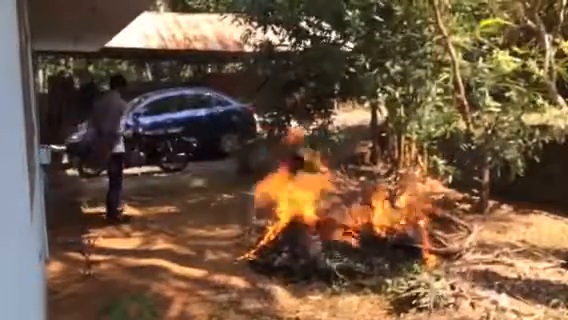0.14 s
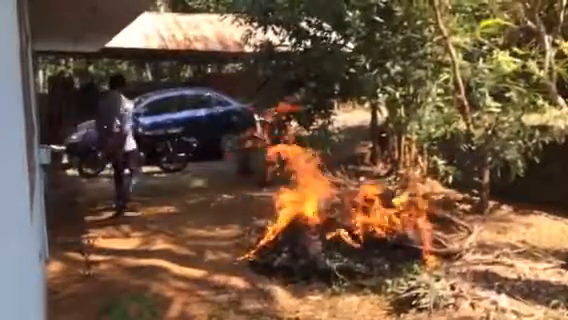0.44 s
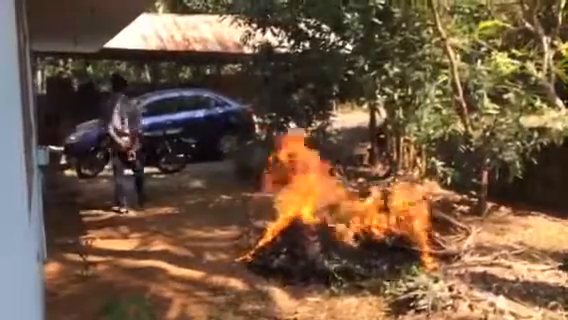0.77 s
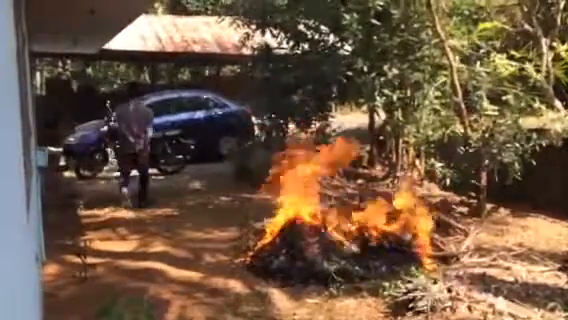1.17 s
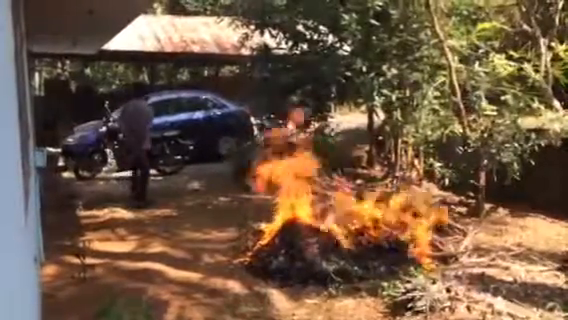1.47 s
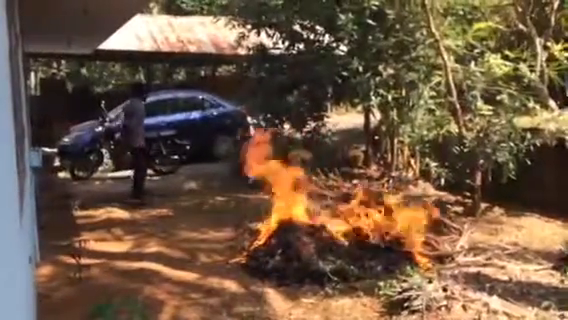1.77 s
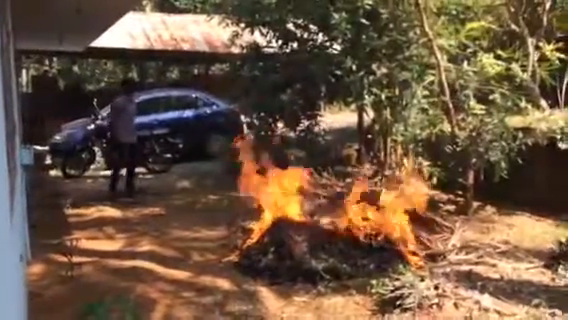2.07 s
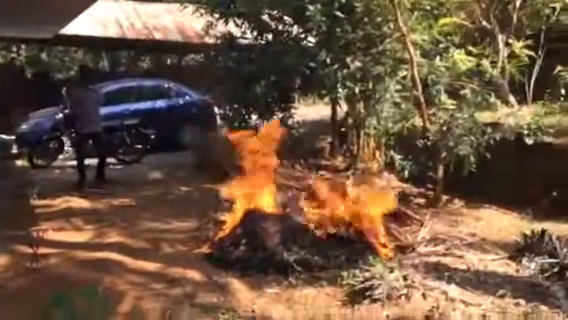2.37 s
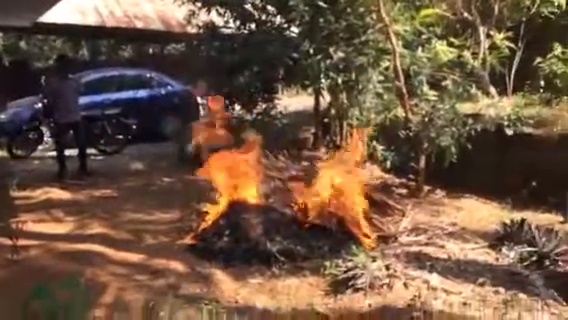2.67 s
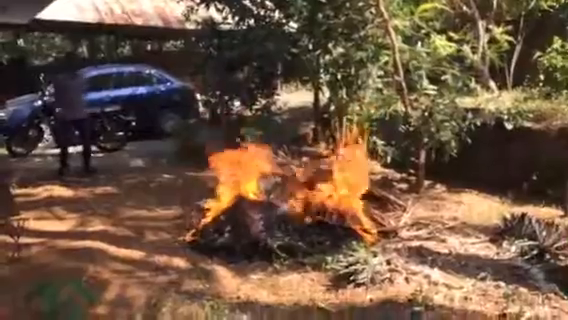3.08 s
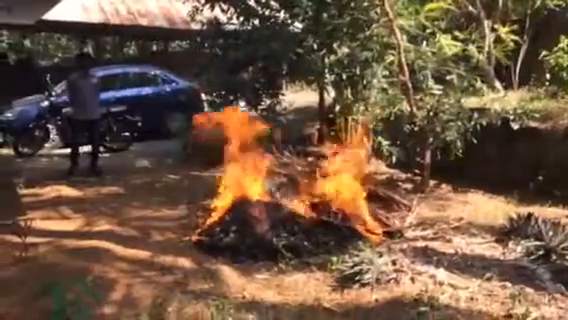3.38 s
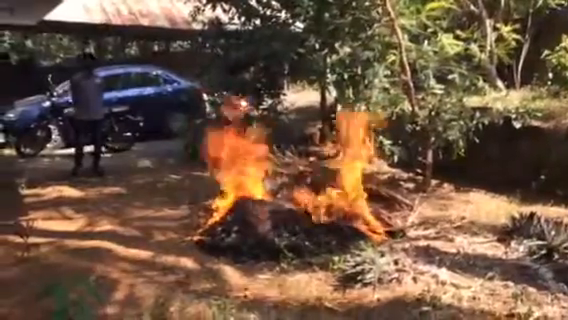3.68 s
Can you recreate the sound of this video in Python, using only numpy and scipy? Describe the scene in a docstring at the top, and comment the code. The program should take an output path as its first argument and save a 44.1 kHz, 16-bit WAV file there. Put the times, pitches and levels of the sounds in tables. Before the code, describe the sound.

Fire crackles in an outdoor yard, heard from a few metres away: fine dry leaf ticks throughout, then increasingly dense twig snaps with short scattered echoes, above low fluttering flames and faint airy hiss.

```python
"""A pile of leaves and branches burns in an open yard, a few metres from the microphone.
From the start dry leaves tick in random snaps over a noise sizzle, and filtered noise rumbles as flames.
Outdoor air, a midrange hiss and a thin wavering sine whine stand behind; the whine peaks near 1.1 s.
From 0.38 s twigs burst in sharp noise pops that scatter back from the yard, the highest level at 3.28 s.
The ticks grow strongest around 3 s, then fade towards the end."""
import sys
import numpy as np
from scipy import signal
from scipy.fft import rfft, irfft, next_fast_len
from scipy.io import wavfile
from scipy.ndimage import uniform_filter1d

SR = 44100
rng = np.random.default_rng(int(sys.argv[2]) if len(sys.argv) > 2 else 0)


def store_pcm(level_fs):
    """Save levels as 16-bit WAV."""
    pcm = np.round(np.clip(level_fs, -1, 1) * 32767).astype(np.int16)
    wavfile.write(sys.argv[1], SR, np.atleast_2d(pcm).T)


N = 169344

# How briskly the leaves burn: start_s, briskness [no unit; TICK_DB_PER_BRISKNESS turns it into dB]
BRISKNESS = [(0, -2), (.38, -1.5), (.58, -1), (1.0, -3), (1.33, -2.5), (1.7, -2), (2.2, 0), (2.5, 1.5),
             (2.65, 0.5), (3.0, 4), (3.2, -1.5), (3.45, 1.5), (3.65, -5.5), (3.84, -13)]
# Tone of the leaf ticks: freq_hz, gain_db
TICK_COLOUR = [(200, -63), (900, -1.5), (2200, -17.5), (3200, -1), (6000, -0.5), (9000, 0.5), (15000, 3)]
# Spectrum shape of the sizzle: freq_hz, relative_db [per Hz]
SIZZLE_SPECTRUM = [(300, -30), (1500, -39), (3000, -4), (4300, -0.5), (6800, 2.5), (10000, 0),
                   (15000, -0.5)]
# Level of the sizzle: start_s, level_db [rms]
SIZZLE_LEVEL = [(0, -66), (.4, -66.5), (.54, -61), (.66, -60), (.8, -62.5), (1.0, -62.5), (1.33, -62),
                (1.5, -63), (1.7, -61), (1.88, -62), (2.2, -64.5), (2.5, -62.5), (2.64, -63.5), (3.0, -65),
                (3.2, -58), (3.45, -63), (3.65, -60), (3.84, -60.5)]
# Spectrum shape of the flames' rumble: freq_hz, relative_db [per Hz]
RUMBLE_SPECTRUM = [(15, -27), (28, -15), (45, -9), (62, -8), (85, -4), (115, -1), (150, -4), (185, -5.5),
                   (225, -21.5), (300, -19.5), (600, -45.5), (2000, -71)]
# Surges of the flames, mostly low: centre_s, length_s, centre_hz, level_db [rms at the peak]
FLAME_SURGES = [(0.06, 0.15, 97, -47), (0.252, 0.29, 170, -57.5), (0.568, 0.086, 107, -49.5),
                (0.712, 0.059, 278, -57.5), (1.29, 0.055, 117, -49.5), (1.575, 0.047, 283, -50.5),
                (2.036, 0.054, 118, -50), (2.259, 0.071, 113, -46.5), (2.49, 0.16, 112, -53.5),
                (2.514, 0.073, 256, -57), (2.898, 0.25, 1690, -68), (2.998, 0.032, 102, -44.5),
                (3.412, 0.064, 253, -54), (3.605, 0.024, 1490, -61), (3.809, 0.075, 97, -45.5)]
# Spectrum shape of the low outdoor noise: freq_hz, relative_db [per Hz]
OUTDOOR_SPECTRUM = [(100, -3.5), (230, -3.5), (280, -0.5), (325, -4), (410, 3), (490, -6), (570, -4),
                    (780, -10), (1200, -24), (3000, -39)]
# Middle level of the outdoor noise, which drifts around it: start_s, level_db
OUTDOOR_LEVEL = [(0, -64), (.45, -59), (.7, -61.5), (1.0, -62.5), (1.7, -62), (2.2, -61), (2.55, -58.5),
                 (2.85, -59), (3.1, -61), (3.5, -60.5), (3.84, -60.5)]
# Spectrum shape of the midrange hiss: freq_hz, relative_db [per Hz]
MID_HISS_SPECTRUM = [(300, -28), (800, -6), (1120, 1.5), (1350, 4.5), (1550, -1.5), (2200, -4.5),
                     (2560, -1), (2950, -9.5), (6000, -17), (15000, -37)]
# Middle level of the midrange hiss, which drifts around it: start_s, level_db
MID_HISS_LEVEL = [(0, -60.5), (.38, -62), (.55, -63), (1.1, -62.5), (1.7, -64.5), (2.3, -63.5),
                  (2.7, -65.5), (3.0, -61), (3.5, -63.5), (3.6, -60), (3.84, -62.5)]
# Thin whine, middle values that it wavers around: start_s, pitch_hz, level_db
WHINE = [(0, 1261, -71), (.5, 1262, -69), (.7, 1255, -64.5), (.82, 1254, -69), (1.03, 1262, -62.5),
         (1.1, 1262, -57.5), (1.16, 1275, -66), (1.22, 1282, -64.5), (1.33, 1292, -60), (1.43, 1263, -75),
         (2.3, 1308, -74), (3.0, 1292, -72.5), (3.5, 1303, -75), (3.84, 1278, -65)]
# Bursting twigs: start_s, level_db [before POP_LIFT_DB], bass_db, treble_db,
# echo_db [sent to the yard, against the pop], ring_hz, splinter_db [against the snap, held to 0 at most]
TWIG_POPS = [(0.3794, -46.5, 10, -4, -11, 7250, -7), (0.3936, -52.5, 0, 0, -10, 7020, -11),
             (0.9201, -48.5, -2, 1, 0, 6460, -10), (1.0389, -50, 12, 10, -3, 12340, -7),
             (1.0603, -40.5, -6, -0.5, -1.5, 7100, -12), (1.1455, -43.5, 5, 4.5, -5, 7600, -1),
             (1.264, -44.5, -28, 0.5, -9, 6050, -8), (1.3688, -41.5, -36, -2.5, -4.5, 5800, -17),
             (1.4004, -48, -18, 3, -10, 8020, 0), (1.5568, -28.5, -3.5, -3.5, -2.5, 5540, -14.5),
             (1.6069, -44, -3, -1, -10, 5230, -9), (1.8994, -37, -2, 0, -1, 6200, -11),
             (2.007, -41.5, 1, -5, -20, 5140, -8), (2.265, -27.5, -27, 6, -1, 10090, 13),
             (2.3699, -44.5, -16, 4, -7, 7850, -19), (2.3932, -42, -1, 0.5, -3, 5400, -2),
             (2.4437, -34.5, -4, 6, -4.5, 13500, -10), (2.5081, -51.5, -11, 3, -7, 8680, -3),
             (2.6006, -46, 8, 5, -6, 13430, 0), (2.6562, -35.5, -5, 6, -5.5, 11800, -4),
             (2.7044, -33, -8, 4.5, 0.5, 10900, -12), (2.7102, -33.5, -5.5, -0.5, -2, 6910, 0),
             (2.7544, -38, 0, 4.5, -3.5, 10910, -6), (2.8669, -44.5, 2, 0, -20, 5160, 3),
             (2.9175, -42.5, 4, 5, -16, 7410, -7), (2.926, -46.5, -2, 0, -1, 5520, 0),
             (3.0031, -39, 2, 2, 0, 3060, 4), (3.1214, -42.5, 3, 6, 5, 12150, 1),
             (3.158, -42, -14, -2, -4, 11290, -5), (3.1871, -43.5, 2, 1, -13, 8980, 0),
             (3.2039, -45.5, 0, 1, -1, 13680, 1), (3.2166, -39, 5, 6, -8, 4750, -6),
             (3.238, -43.5, -1, 6, -1, 13470, -6), (3.2759, -19, 0, 0, -10.5, 3250, -12),
             (3.3455, -42.5, -22, 3, -8, 13350, -7), (3.3864, -47.5, -15, -4, -7, 6730, 1),
             (3.3914, -44, -10, 1, -11, 6900, 0), (3.3998, -46.5, 6, 1, -0.5, 9540, 4),
             (3.4421, -50.5, 2, 0, 2, 5540, 4), (3.6892, -26.5, -5, 4.5, -7, 8900, 1),
             (3.701, -32, -6.5, -3, -5.5, 4790, -6)]
# Tone of all the pops: freq_hz, gain_db
POP_COLOUR = [(100, -29), (480, -11.5), (950, 0.5), (1400, -4), (2300, 1.5), (3200, -0.5), (4100, -1),
              (5400, 3), (8000, 2), (13000, -1), (15000, -5)]

# The break, then the fibres tearing after it: decay times to 1/e
SNAP_S, SPLINTER_S = 0.00063, 0.0029
FLATTEN = .5  # how far each pass evens out a break's random spectrum, 0-1

TICKS_PER_S, TICK_DB, TICK_SPREAD_DB = 300, -46.5, 4.5
TICK_DB_PER_BRISKNESS = 1.7
# Each leaf favours its own broad band; the spread is in natural-log units of pitch
LEAF_HZ, LEAF_SPREAD, LEAF_WIDTH_HZ, LEAF_RING_DB = 7300, 0.59, 1400, 8.5
LEAF_SPLINTER_DB = -9.5
SIZZLE_GRAIN_DB = -0.5
RUMBLE_DB, FLUTTER_DB = -53.5, 0.6
SURGE_WIDTH = 0.15  # share of the centre frequency
OUTDOOR_DRIFT_DB, MID_HISS_DRIFT_DB = 2.16, 2.2
WHINE_WAVER_HZ, WHINE_FLICKER_DB, WHINE_OCTAVE_DB = 11.9, 2.5, -20
ECHO_DELAY_S, ECHO_T60_S, ECHO_DB, FAR_T60_S, FAR_DB = .005, 0.19, -0.5, 0.78, -27.5
ECHO_GRAIN_DB = 3  # unevenness of the scatter
TICK_ECHO_DB = -12
POP_LIFT_DB = 20.5
RING_WIDTH_HZ, RING_DB = 200, 9  # each twig has one short resonance
TOP_HZ = 15200


def undb(db):
    """Decibels to gain."""
    return 10 ** (np.asarray(db) / 20)


def unit(x):
    """Scale to an rms of 1."""
    return x / np.sqrt(np.mean(x ** 2))


def sized(x, db):
    """Set the energy of a short sound."""
    return x / np.sqrt(np.sum(x ** 2)) * undb(db)


def curve(table, axis=1):
    """One column of a time table, at every sample."""
    rows = np.array(table)
    return np.interp(np.arange(N) / SR, rows[:, 0], rows[:, axis])


def walk(rate):
    """Smooth random drift with an rms of 1, from `rate` random steps a second."""
    k = max(int(SR / rate), 2)
    steps = rng.standard_normal(N // 8)[np.arange(N) // k]
    return unit(uniform_filter1d(uniform_filter1d(steps, k), k))


def colour(x, points):
    """Causal minimum-phase filter through (Hz, dB) points."""
    size = 2 * next_fast_len(len(x))
    hz, db = np.array(points, float).T
    log_freq = np.log(np.fft.rfftfreq(size, 1 / SR) + 1)
    gain = undb(np.interp(log_freq, np.log(hz), db))
    # fold the cepstrum forward in time, so that nothing sounds early
    cepstrum = irfft(np.log(gain))
    cepstrum[1:size // 2] *= 2
    cepstrum[size // 2 + 1:] = 0
    response = np.exp(rfft(cepstrum))
    return irfft(rfft(x, size) * response)[:len(x)]


def noise(spectrum):
    """Steady noise of a given spectrum shape, at an rms of 1."""
    return unit(colour(rng.standard_normal(N), spectrum))


def add(out, at_s, x):
    """Mix a short sound in at a given time."""
    i = max(int(at_s * SR), 0)
    out[i:i + len(x)] += x[:max(N - i, 0)]


def ring(x, hz, width_hz, db):
    """Lift one resonance out of a sound."""
    hz = min(hz, .4 * SR)
    b, a = signal.iirpeak(hz, hz / width_hz, fs=SR)
    return x + (undb(db) - 1) * signal.lfilter(b, a, x)


def crack(splinter_db, size=640):
    """One broadband break of unit energy: a sudden snap and a few milliseconds of splintering."""
    t = np.arange(size) / SR
    snap, fibres = rng.standard_normal((2, size))
    x = np.tanh(2 * snap) * np.exp(-t / SNAP_S)
    x = x + undb(min(splinter_db, 0)) * fibres * np.exp(-t / SPLINTER_S)
    for _ in range(2):  # even out the spectrum, so that the break has little pitch
        spectrum = rfft(x, 2 * size)
        x = irfft(spectrum / (np.abs(spectrum) + 1e-12) ** FLATTEN)[:size]
    return sized(x, 0)


def leaf_ticks(briskness, count=2000):
    """Small random breaks, some dull and some bright, mostly faint, stronger as the leaves burn briskly."""
    out = np.zeros(N)
    gaps, strengths = rng.exponential(size=(count, 2)).T
    starts_s = np.cumsum(gaps) / TICKS_PER_S
    levels_db = TICK_DB + TICK_SPREAD_DB * np.minimum(strengths, 3.2)
    pitches_hz = LEAF_HZ * np.exp(LEAF_SPREAD * rng.standard_normal(count))
    for start_s, level_db, pitch_hz in zip(starts_s, levels_db, pitches_hz):
        if start_s < N / SR:
            tick = ring(crack(LEAF_SPLINTER_DB), pitch_hz, LEAF_WIDTH_HZ, LEAF_RING_DB)
            add(out, start_s, sized(tick, level_db))
    return colour(out, TICK_COLOUR) * undb(TICK_DB_PER_BRISKNESS * briskness)


def sizzle():
    """Countless tiny bursts merged into a grainy hiss: noise with a fast random level."""
    grains = rng.standard_normal(N) * undb(SIZZLE_GRAIN_DB * walk(1800))
    return unit(colour(grains, SIZZLE_SPECTRUM)) * undb(curve(SIZZLE_LEVEL))


def flames():
    """Turbulent low rumble with a fluttering level, and narrow noise bands that surge now and then."""
    out = noise(RUMBLE_SPECTRUM) * undb(RUMBLE_DB + FLUTTER_DB * walk(11))
    t = np.arange(N) / SR
    for centre_s, length_s, centre_hz, level_db in FLAME_SURGES:
        offset = (np.fft.rfftfreq(N, 1 / SR) / centre_hz - 1) / SURGE_WIDTH
        band = irfft(rfft(rng.standard_normal(N)) * np.exp(-offset ** 2 / 2), N)
        swell = np.exp(-(2 * (t - centre_s) / length_s) ** 2)
        swell_rms = np.sqrt(np.mean(swell ** 2))
        out = out + unit(band * swell) * swell_rms * undb(level_db)
    return out


def outdoor_air():
    """Low outdoor noise whose level drifts."""
    return noise(OUTDOOR_SPECTRUM) * undb(curve(OUTDOOR_LEVEL) + OUTDOOR_DRIFT_DB * walk(16))


def mid_hiss():
    """Midrange noise whose level drifts."""
    return noise(MID_HISS_SPECTRUM) * undb(curve(MID_HISS_LEVEL) + MID_HISS_DRIFT_DB * walk(21.78))


def thin_whine():
    """A sine with a weak octave, unsteady in pitch and level."""
    pitch_hz = curve(WHINE) + WHINE_WAVER_HZ * walk(130)
    phase = 2 * np.pi * np.cumsum(pitch_hz) / SR
    tone = unit(np.sin(phase) + undb(WHINE_OCTAVE_DB) * np.sin(2 * phase))
    return tone * undb(curve(WHINE, axis=2) + WHINE_FLICKER_DB * walk(45))


def yard_echo(x, size=24000):
    """Uneven scatter from ground, walls and foliage as decaying noise, with a faint longer tail."""
    t = np.arange(size) / SR
    fade = undb(-60 * t / ECHO_T60_S) + undb(FAR_DB - 60 * t / FAR_T60_S)
    grain = undb(ECHO_GRAIN_DB * np.clip(walk(1500)[:size], -2, 2))
    scatter = rng.standard_normal(size) * grain * fade * (t > ECHO_DELAY_S)
    return signal.fftconvolve(x, sized(scatter, ECHO_DB))[:N]


def twig_pops(size=640):
    """Bursting twigs, each with its own colour and ring; gives the direct pops and the pulses for the yard."""
    direct, sent = np.zeros(N), np.zeros(N)
    for start_s, level_db, bass_db, treble_db, echo_db, ring_hz, splinter_db in TWIG_POPS:
        tone = [(1600, bass_db), (3200, 0), (6500, 0), (10000, treble_db)]  # (Hz, dB)
        pulse = colour(signal.unit_impulse(size), tone)
        pop = ring(np.convolve(pulse, crack(splinter_db)), ring_hz, RING_WIDTH_HZ, RING_DB)
        pop_db = level_db + POP_LIFT_DB
        add(direct, start_s, sized(pop, pop_db))
        add(sent, start_s, sized(pulse, pop_db + echo_db))
    return colour(direct, POP_COLOUR), colour(sent, POP_COLOUR)


def scene():
    """Fire, yard echo and background on one microphone."""
    pops, sent = twig_pops()
    ticks = leaf_ticks(curve(BRISKNESS))
    echo = yard_echo(sent + undb(TICK_ECHO_DB) * ticks)
    fire = pops + ticks + sizzle() + flames()
    background = outdoor_air() + mid_hiss() + thin_whine()
    return (fire + echo + background)[None]


def record(dry):
    """The recorder cuts the top with a steep low-pass."""
    low_pass = signal.ellip(10, .2, 70, TOP_HZ, fs=SR, output="sos")
    return signal.sosfilt(low_pass, dry)


dry = scene()
out = record(dry)
store_pcm(out)
```